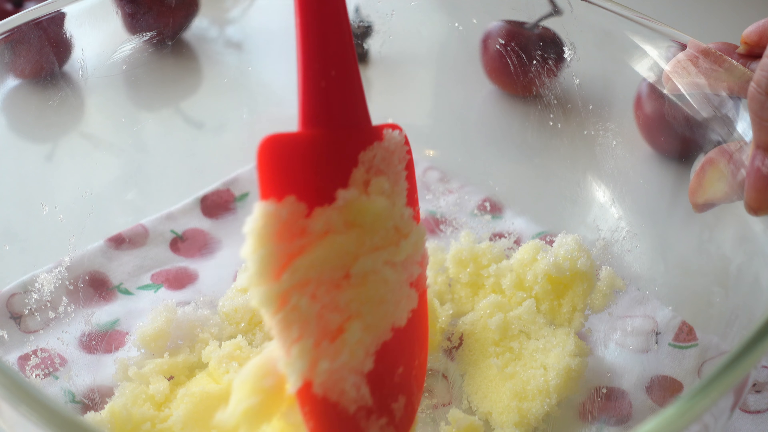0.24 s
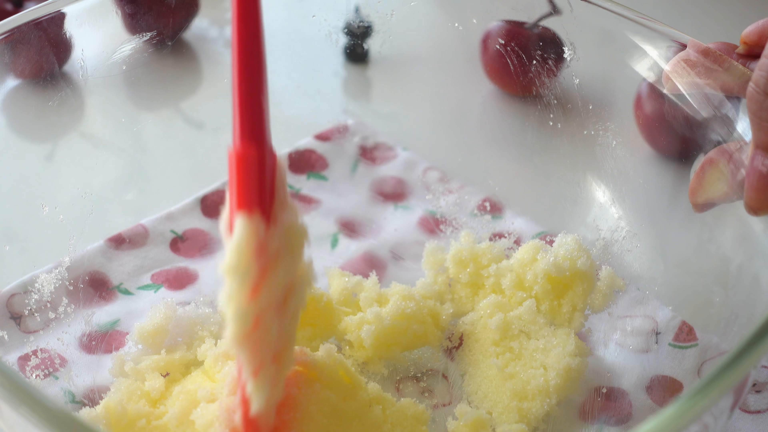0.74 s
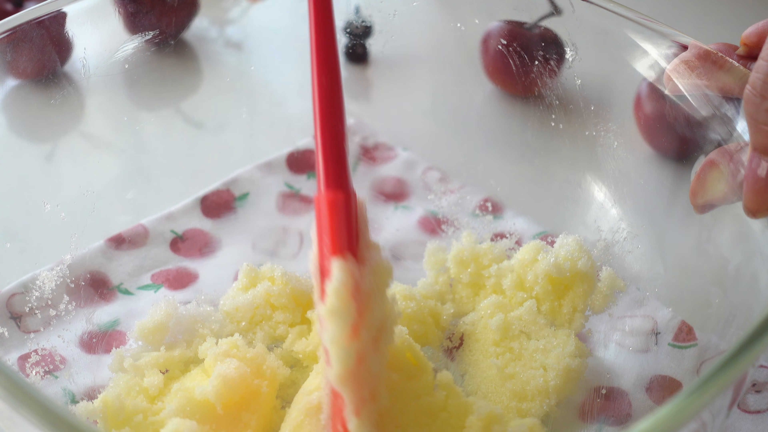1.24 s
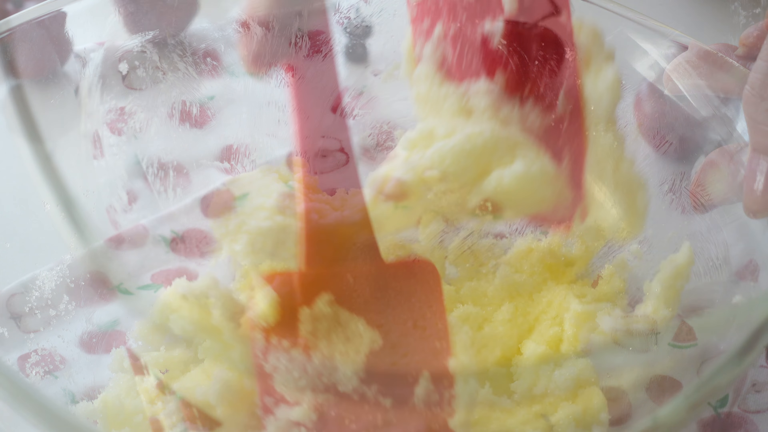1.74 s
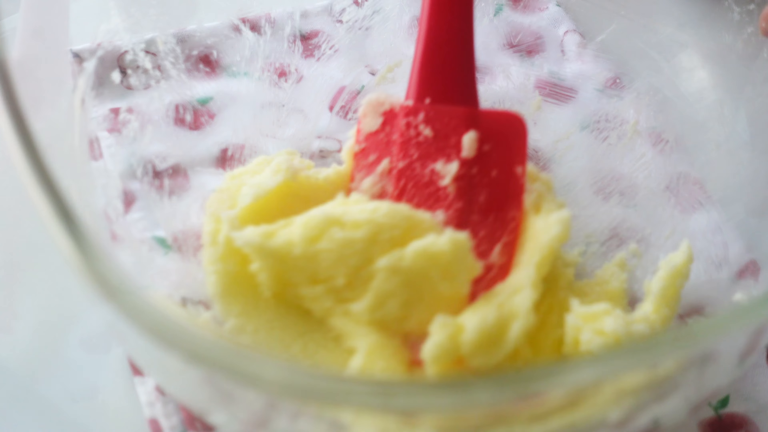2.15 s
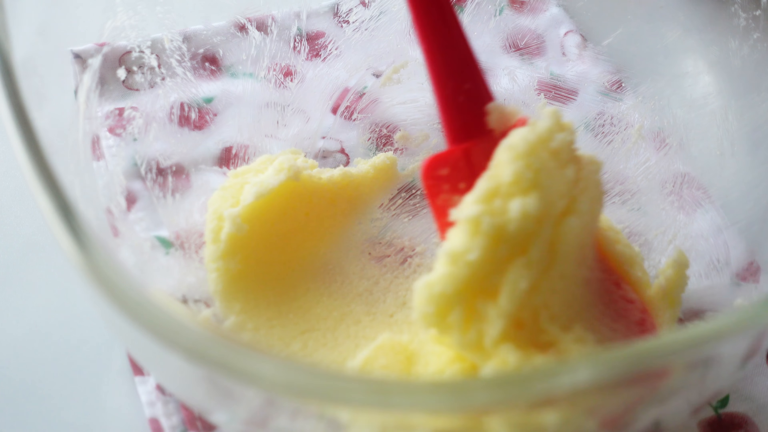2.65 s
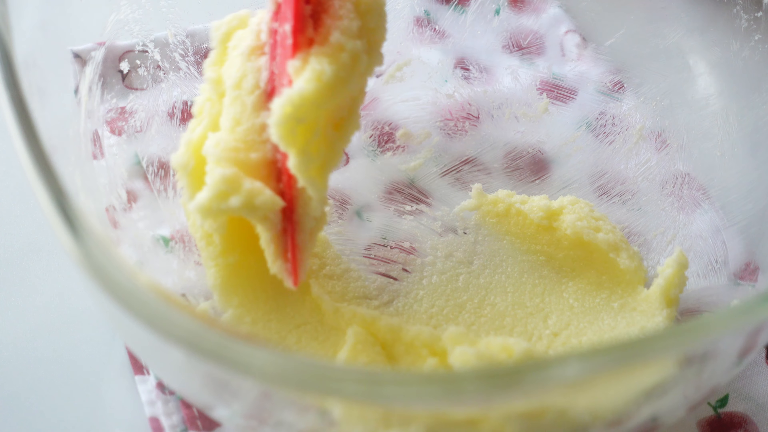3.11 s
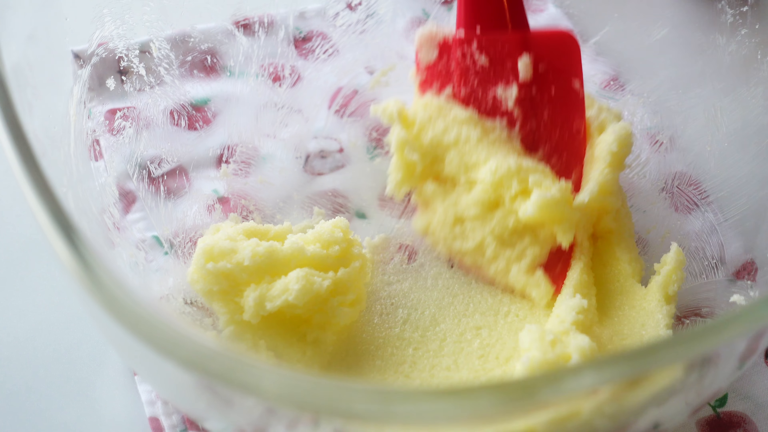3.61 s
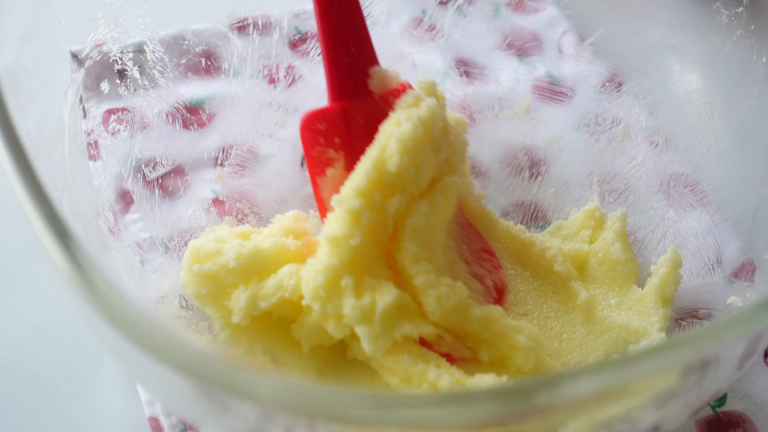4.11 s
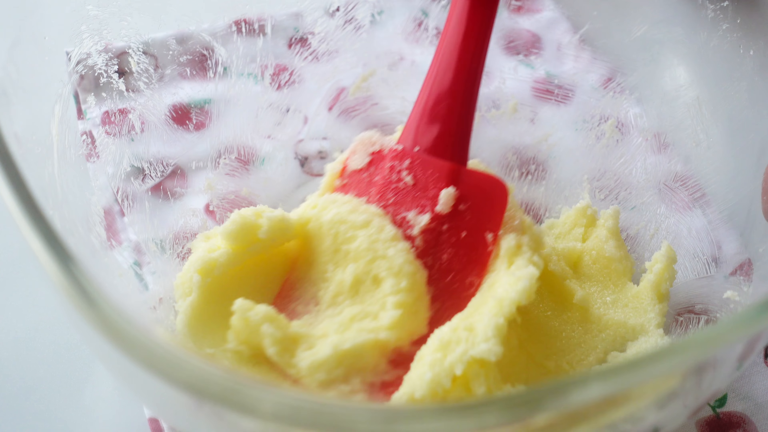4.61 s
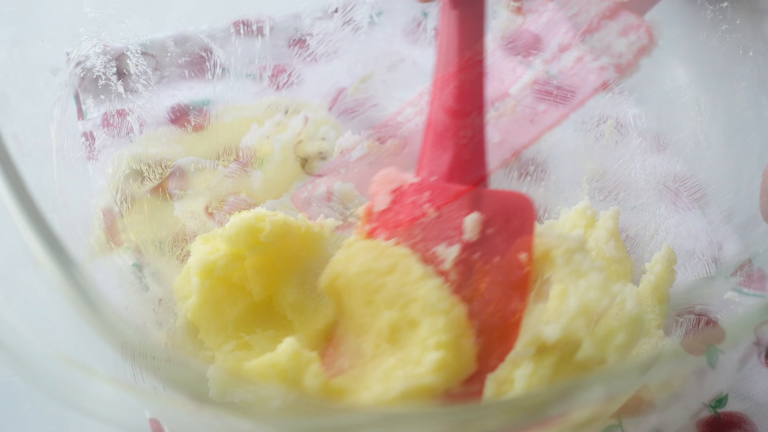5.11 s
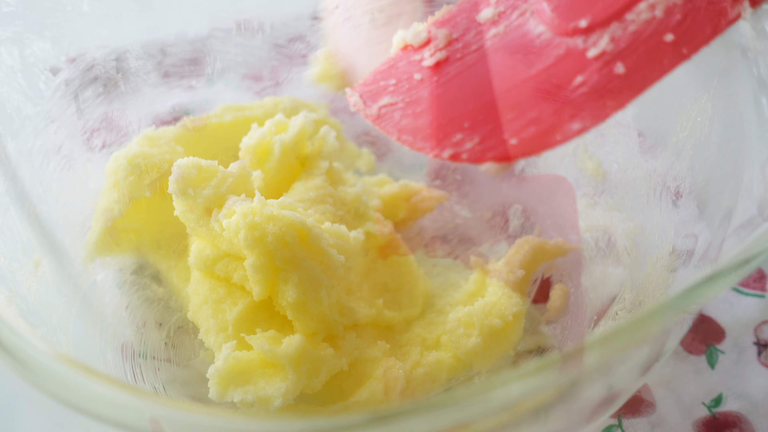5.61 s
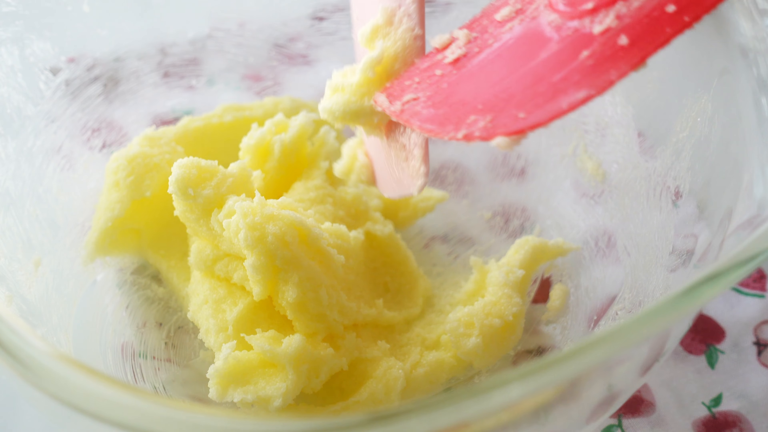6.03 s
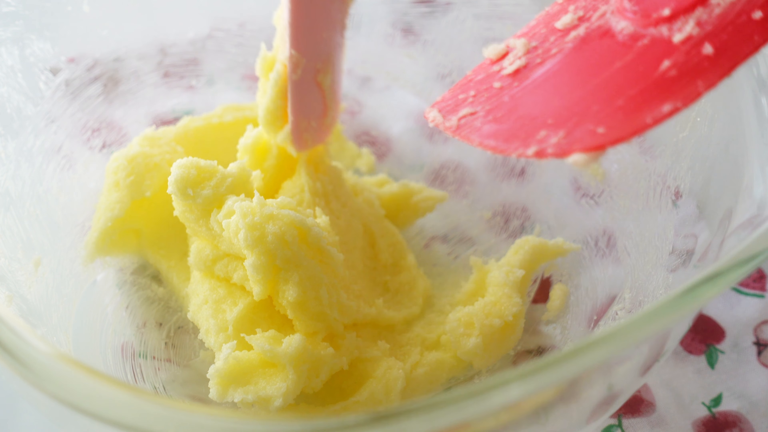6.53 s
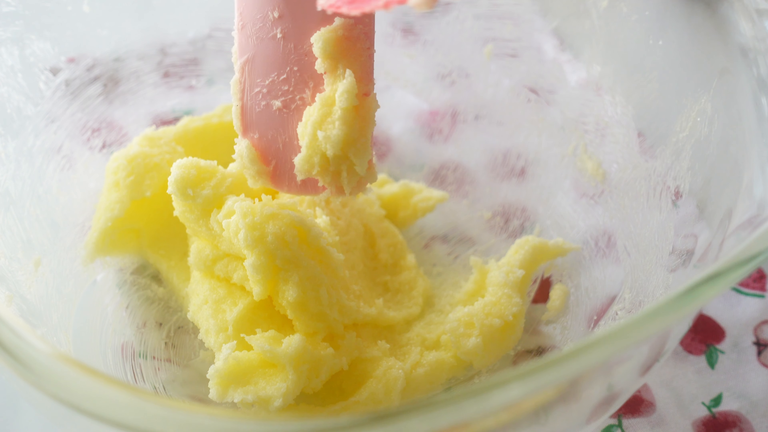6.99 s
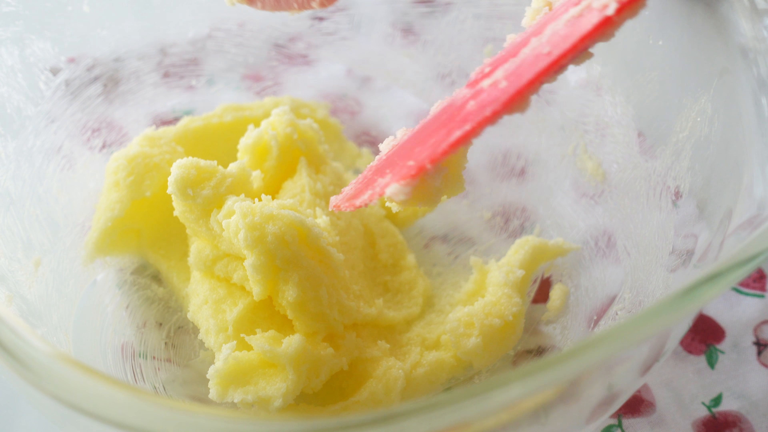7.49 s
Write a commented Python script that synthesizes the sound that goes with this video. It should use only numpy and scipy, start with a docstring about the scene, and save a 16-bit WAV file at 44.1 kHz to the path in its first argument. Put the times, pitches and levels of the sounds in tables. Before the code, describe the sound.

Close stereo sound in a quiet kitchen: sandy crunching as a soft blade works sugar into butter against glass. Early strokes are loose and thin, with a tiny level dip just after one second, then they grow harder, with bright pings of cracking crystals, brief rough squeaks and muffled thuds. After six seconds, rubber scrapes lightly on rubber, almost fading into faint hum and airy room noise.

```python
"""A rubber spatula drags butter and sugar round a glass bowl: crystals slip in crowds, each ringing briefly.
The fainter late drags are two spatulas scraping each other clean. Single crystals crack as short, bright pings,
friction noise through resonances squeaks, and knocks ring the damped glass over a dull thud.
The microphone stand wobbles after a push as slow decaying sines, and the whole level dips briefly.
Mains hum (sines) and kitchen rush (banded noise) lie below and change a little from spell to spell."""
import sys
import numpy as np
from scipy import signal
from scipy.io import wavfile

SR = 44100
rng = np.random.default_rng(int(sys.argv[2]) if len(sys.argv) > 2 else 0)


def unload_audio(sound):
    """Save the sound as a 16-bit wav file, at the path given as the first command line argument."""
    columns = np.transpose(np.atleast_2d(sound))
    # keep every value between -1 and 1, then stretch to whole-number steps
    steps = np.round(np.clip(columns, -1, 1) * 32767)
    wavfile.write(sys.argv[1], SR, steps.astype(np.int16))


N = 341775

# Spells of steady background. Each row: start in seconds, mains frequency in Hz, hum level in dB.
BACKGROUND_SPELLS = [(0, 59.97, -40), (1.276, 59.96, -40.2), (5.862, 59.91, -38.3)]


def from_db(db):
    """Turn dB into an amplitude gain."""
    return 10 ** (np.asarray(db) / 20)


def rms_one(x):
    """Scale to rms 1."""
    return x / np.sqrt(np.mean(x ** 2) + 1e-20)


def at_hz(points, hz):
    """Read a table of (Hz, value) between its points on a log-frequency axis."""
    table_hz, values = np.array(points).T
    return np.interp(np.log(hz), np.log(table_hz), values)


def drift(rate_hz):
    """Random wander of rms about 1: noise through two equal one-pole low-passes at rate_hz."""
    step = 40  # samples between the points of the wander
    settling = 2000  # points dropped while the filter settles
    pole = np.exp(-2 * np.pi * rate_hz * step / SR)
    noise = rng.standard_normal(N // step + settling + 2)
    slow = signal.lfilter([1], [1, -2 * pole, pole * pole], noise)[settling:]
    return np.interp(np.arange(N) / step, np.arange(len(slow)), rms_one(slow))


def ring(push, hz, t60_s):
    """Damped resonance: a unit click sets a sine of initial height 1 decaying by 60 dB in t60_s."""
    decay = from_db(-60 / (t60_s * SR))
    turn = 2 * np.pi * hz / SR
    feedback = [1, -2 * decay * np.cos(turn), decay * decay]
    return signal.lfilter([0, np.sin(turn)], feedback, push + 1e-18)


def spell(values):
    """Hold one value through each spell of background."""
    starts = np.array(BACKGROUND_SPELLS)[:, 0]
    which = np.searchsorted(starts, np.arange(N) / SR, "right") - 1
    return np.asarray(values)[which]


def spread(mid, side, hz):
    """Stereo from mid and side: narrowest in the low treble, wider toward the top."""
    # Side level of the scraping and cracking by frequency. Each row: frequency in Hz, side relative to mid in dB.
    side_db = [(1300, -16), (2400, -26), (4400, -20), (8000, -8), (15000, -5)]
    return mid + from_db(at_hz(side_db, hz)) * side * np.array([[1], [-1]])


def blade_pressure():
    """Gains of medium, coarse and fine grit and of the rub; drags and presses add in power."""
    # Blade drags through the mix. Each row: start and end in seconds, medium grit at the start and at the end
    # in dB, lift-off in seconds, then relative to medium in dB: coarse grit, fine grit, rub of the rubber.
    drags = [(0.0, 0.045, -49.5, -53, 0.18, 2.5, -4.5, -6), (0.796, 0.83, -42, -47, .04, 2, 0.5, -9),
             (0.87, 1.057, -53, -69, 0.14, -2, -2.5, -7), (1.33, 1.732, -59.5, -44.5, 0.038, 2.5, -2, -8),
             (1.956, 2.317, -52, -41, 0.038, -1, -6, -7.5), (2.36, 2.517, -72, -72, .03, 2, -5, -10),
             (2.594, 2.861, -55.5, -44, 0.063, 0.5, -2.5, -6), (2.894, 3.1, -51, -47.5, 0.039, 0, -3, -8),
             (3.128, 3.363, -59.5, -48.5, .06, -2, -4.5, -13), (3.4, 3.68, -65, -47.5, 0.06, 2, 2.5, -6),
             (3.989, 4.275, -48, -42, 0.059, 0, -3, -9), (4.32, 4.39, -61, -65, .03, -3, 1, -13),
             (4.507, 4.827, -50, -43.5, .024, 0, -2.5, -8.5), (5.02, 5.39, -55.5, -48.5, 0.085, -2, -3, -8),
             (5.54, 5.852, -53, -42.5, 0.0053, 3, -1.5, -9), (5.982, 6.26, -64, -81, .03, 2.5, 1, -6),
             (6.37, 6.518, -60, -56, 0.072, -2.5, -2.5, -12), (6.56, 7.18, -70.5, -81, .03, 3, -3, -6),
             (7.25, 7.417, -70, -61.5, .026, 2, -2, -9)]
    # Brief harder presses. Each row: peak time in seconds, medium grit in dB, rise and fade in seconds,
    # then relative to medium in dB: coarse grit, fine grit, rub of the rubber.
    presses = [(0.386, -39.5, 0.1, 0.093, 0.5, -9.5, -14), (0.53, -41, 0.06, 0.042, -0.5, -6, -18),
               (0.849, -33.5, 0.032, 0.02, -5.5, -13, -18), (0.994, -49.5, 0.054, 0.07, 0.5, -5, -9),
               (1.145, -49.5, 0.014, 0.0092, 5, -3, -14), (1.268, -44, 0.087, 0.063, 2, -1, -9.5),
               (1.311, -44, 0.034, 0.03, -3, -3.5, -16), (1.46, -44, .15, 0.22, -3, -8, -9.5),
               (1.69, -46.5, 0.11, .07, 7.5, 4, -12), (1.981, -44, 0.038, 0.035, 7.5, 1.5, -2),
               (2.098, -47, 0.1, .15, -3, -0.5, -11), (2.281, -33.5, 0.11, 0.056, 1.5, 1.5, -19),
               (2.559, -41, 0.031, 0.027, -1.5, -8, -9), (2.635, -43.5, 0.024, 0.029, -7, -6, -8),
               (2.845, -50, 0.15, 0.038, -7, -7, -16), (3.25, -35.5, 0.022, 0.021, -5.5, -11, -8.5),
               (3.309, -46, 0.1, 0.082, -3, -7, -7.5), (3.597, -36, 0.27, 0.14, -2.5, -7.5, -14.5),
               (3.913, -35, 0.033, 0.046, -3, -4, -1.5), (4.031, -30, 0.026, .06, -11.5, -12, -11),
               (4.446, -38.5, 0.036, .075, -6, -4.5, -10.5), (4.706, -44, 0.13, 0.064, 1.5, -1, -8),
               (4.765, -39, 0.054, .055, 6.5, 3.5, -9), (4.977, -66, .012, .015, 3, 6, 1),
               (5.026, -39, 0.017, .075, -1.5, -4, -7.5), (5.165, -43.5, 0.12, 0.23, 2, -1.5, -8),
               (5.318, -43, 0.15, 0.12, 4.5, 0, -9.5), (5.558, -41, 0.028, 0.054, -7, -3.5, -5.5),
               (5.921, -56, 0.063, 0.11, 3, -1, -16), (6.297, -49.5, 0.04, 0.043, -3, -6, -20),
               (6.43, -55, 0.091, .08, -4.5, -12, -14), (6.475, -43.5, .022, 0.034, -18, -8, -23),
               (7.277, -61.5, 0.095, 0.12, -1.5, 1, -9)]
    land_s, edge_db = 0.033, 28  # a drag rises by edge_db in land_s and falls as much in its lift-off
    fade_db, roundness = 21, 1.21  # a press loses fade_db over its rise or fade; loss grows as this power of time

    t = np.arange(0, N + 32, 32) / SR
    shapes = []
    for start, end, first_db, last_db, lift_s, *colour in drags:
        level_db = np.interp(t, [start, end], [first_db, last_db])
        landing_db = edge_db * np.maximum((start - t) / land_s, 0)
        lifting_db = edge_db * np.maximum((t - end) / lift_s, 0)
        shapes.append((level_db - landing_db - lifting_db, colour))
    for peak_s, peak_db, rise_s, fade_s, *colour in presses:
        away = np.maximum((peak_s - t) / rise_s, (t - peak_s) / fade_s)
        shapes.append((peak_db - fade_db * away ** roundness, colour))

    power = 0
    for level_db, colour in shapes:
        power = power + from_db(np.add.outer([0] + colour, level_db)) ** 2
    return [np.interp(np.arange(N) / SR, t, np.sqrt(p)) for p in power]


def random_sizes(size_db, limit):
    """Random stereo impulse heights of either sign, with a few much larger."""
    size = np.minimum(rng.exponential(1, (2, N)), limit)
    return from_db(size_db * size) * rng.choice([-1, 1], (2, N))


def grit(modes, per_s, size_db, cycles, clump):
    """Random slips, a few much larger, ring short resonances whose strengths wander separately."""
    out = 0
    for hz, level_db in modes:
        favour = from_db(2.56 * drift(8.7))
        happens = rng.random((2, N)) < per_s / SR
        slips = random_sizes(size_db, 5) * clump * favour * happens
        t60_s = cycles / hz
        mid, side = ring(ring(slips, hz, t60_s), hz, t60_s)
        out = out + from_db(level_db) * spread(rms_one(mid), rms_one(side), hz)
    return rms_one(out)


def crackle(pressure):
    """Small crystals snap one by one, thin and broad, louder as the blade presses harder."""
    snaps = random_sizes(2.5, 4) * (rng.random(N) < 170 / SR)  # 170 snaps a second
    band = signal.butter(2, [2600, 11000], "band", fs=SR, output="sos")
    mid, side = signal.sosfilt(band, snaps)
    return from_db(-9.5) * pressure * rms_one(spread(mid, side, 6500))


def grinding():
    """Crackle, three sizes of sugar grit and the rubber itself under one juddering blade."""
    # Short resonances of the rubber and of each size of grit. Each row: frequency in Hz, relative level in dB.
    rubber_modes = [(1350, -2.1), (1650, -0.62), (2000, 1)]
    coarse_modes = [(2450, -2), (2800, -1.5), (3200, 0.5), (3600, -1.5), (4050, 1.5)]
    medium_modes = [(4500, -9), (5000, 0), (5600, 2), (6200, -1.5), (6750, -8), (7200, -2)]
    fine_modes = [(8200, 1), (9300, -8), (10500, 7), (11600, -8.5), (12800, 4), (14000, -15), (15300, -1)]

    medium, coarse, fine, rub = blade_pressure()
    judder = from_db(0.4 * drift(43) + 0.68 * drift(85))
    # now and then a bigger crystal gives way and briefly jolts all sizes of grit
    gives_way = (rng.random(N) < 120 / SR) * rng.exponential(0.46, N)
    jolts = signal.lfilter([1], [1, -0.93], gives_way)
    jolted = judder * (1 + jolts)

    out = crackle(np.hypot(medium, coarse))
    out = out + rub * grit(rubber_modes, per_s=1500, size_db=3.0, cycles=8.6, clump=judder)
    out = out + coarse * grit(coarse_modes, per_s=1500, size_db=0.5, cycles=11.4, clump=jolted)
    out = out + medium * grit(medium_modes, per_s=2500, size_db=2.5, cycles=13.0, clump=jolted)
    return out + fine * grit(fine_modes, per_s=3000, size_db=0.5, cycles=8.1, clump=jolted)


def hum():
    """Sines at multiples of the mains, the fundamental nearer the left, and a faint high whine."""
    # Hum spectrum. Each row: multiple of the mains, left and right in dB relative to the spell's hum level.
    multiples = [(1, 0, -4.5), (2, -25.5, -19.5), (3, -14.5, -23.5), (4, -40.5, -55), (5, -23.5, -26.5)]
    whine_hz, whine_db = 13884, -82

    _, mains_hz, hum_db = np.transpose(BACKGROUND_SPELLS)
    turn = 2 * np.pi * np.cumsum(spell(mains_hz)) / SR
    lines = 0
    for multiple, left_db, right_db in multiples:
        sine = np.sin(round(multiple) * turn + rng.uniform(0, 2 * np.pi))
        lines = lines + np.outer(from_db([left_db, right_db]), sine)
    whine = np.sin(2 * np.pi * whine_hz * np.arange(N) / SR + 3 * drift(2))  # its phase wanders
    return from_db(spell(hum_db)) * lines + np.outer(from_db([whine_db, whine_db - 15]), whine)


def rush():
    """Third-octave bands of stereo noise, with a broad hump that is strong only in the first spell."""
    # Spectrum of the kitchen rush. Each row: frequency in Hz, relative density in dB per Hz.
    density_db = [(20, -13), (32, -7), (44, 3.5), (85, -7), (125, -8.5), (200, 2), (300, -5.5), (600, -10),
                  (800, -8.5), (1250, -16.5), (1600, -18), (2600, -24), (5000, -29.5), (9000, -37),
                  (16000, -39)]
    # Stereo likeness. Each row: frequency in Hz, left-right correlation from 0 to 1.
    likeness = [(30, 0.38), (180, 0.72), (550, 0.7), (1650, 0.65), (5000, 0.45), (15000, 0.045)]
    # Stereo balance. Each row: frequency in Hz, left over right in dB.
    left_over_right_db = [(30, 10.5), (180, 4), (550, 1), (1650, 2), (15000, -0.5)]
    # Levels, one row a spell: rush in dB, extra hump near 1.4 kHz in dB.
    spell_levels = [(-47.5, -56.5), (-49.5, -72), (-48, -73)]

    out = 0
    edges = 16 * 2 ** (np.arange(31) / 3)
    white = rng.standard_normal((3, 2, N))
    for k, (low, high) in enumerate(zip(edges, edges[1:])):
        band = signal.butter(2, [low, high], "band", fs=SR, output="sos")
        mid, side = signal.sosfilt(band, white[k % 2])  # neighbouring bands use separate noise
        hz = np.sqrt(low * high)
        alike = np.clip(at_hz(likeness, hz), 0, 1)
        pan = from_db(at_hz(left_over_right_db, hz) * np.array([[0.5], [-0.5]]))
        gain = from_db(at_hz(density_db, hz) + 0.73 * drift(4.6))
        stereo = np.sqrt(1 + alike) * mid + np.sqrt(1 - alike) * side * np.array([[1], [-1]])
        out = out + gain * pan * stereo

    hump_band = signal.butter(1, [900, 2000], "band", fs=SR, output="sos")
    mid, side = signal.sosfilt(hump_band, white[2])
    hump = rms_one(mid + 0.39 * side * np.array([[1], [-1]]))
    rush_db, hump_db = np.transpose(spell_levels)
    return from_db(spell(rush_db)) * rms_one(out) + from_db(spell(hump_db)) * hump


def lesser_cracks():
    """Crack rows at random times and pitches, as strong as the blade presses then."""
    count, cycles = 70, 7
    over_grit_db, scatter_db = 11, 5.5  # peak over medium grit, and scatter either way
    low_hz, high_hz = 3230, 6000

    when, size, tint, pitch = rng.random((count, 4)).T
    medium = blade_pressure()[0]
    level_db = 20 * np.log10(medium[(when * N).astype(int)] + 1e-9) + over_grit_db
    seconds = when * N / SR
    peak_db = level_db + scatter_db * (2 * size - 1)
    treble_db = level_db + scatter_db * (2 * tint - 1)
    hz = low_hz + pitch * (high_hz - low_hz)
    return list(zip(seconds, peak_db, hz, treble_db, [cycles] * count))


def cracks():
    """A sharp break ringing a few cycles, a bright tick on top and a splintering tail."""
    # Single crystals cracking. Each row: time in seconds, peak in dB, pitch in Hz, treble peak in dB,
    # cycles of ringing to -60 dB.
    crack_rows = [(0.0201, -37, 4090, -37, 7), (0.4533, -39, 4940, -35, 7), (0.5328, -28, 5680, -32, 7),
                  (0.8938, -29, 3920, -45, 7), (1.2652, -26, 5180, -31, 7), (1.4476, -25, 3040, -29, 7),
                  (1.484, -19, 4870, -26, 4), (1.6283, -23, 3950, -33, 7), (1.6844, -21, 3250, -21, 7),
                  (1.6876, -24, 2880, -24, 7), (1.9815, -21, 3900, -36, 8), (2.0338, -24, 5550, -31, 7),
                  (2.07, -27, 5180, -32, 7), (2.0839, -19, 3850, -30, 4), (2.2588, -24, 3210, -20, 7),
                  (2.2693, -27, 6120, -16, 7), (2.286, -11, 4040, -17, 7), (2.82, -27, 3800, -38, 5),
                  (2.849, -25, 5400, -34, 6), (2.8982, -28, 2680, -37, 7), (2.982, -29, 4760, -31, 7),
                  (3.0942, -25, 3550, -36, 7), (3.2476, -19, 4150, -33, 4), (3.2891, -26, 4920, -23, 7),
                  (3.3323, -27, 4520, -29, 7), (3.3494, -24, 3340, -42, 9), (3.3904, -16, 3320, -27, 14),
                  (3.5462, -14, 4600, -24, 4), (3.5687, -14, 3730, -31, 8), (3.5805, -21, 5300, -32, 7),
                  (3.9167, -17, 2790, -32, 7), (3.941, -25, 3610, -42, 7), (3.976, -27, 3700, -30, 7),
                  (4.0034, -14, 5480, -17, 5), (4.015, -19, 5630, -35, 7), (4.0202, -14, 6150, -21, 7),
                  (4.0283, -20, 5500, -30, 7), (4.0363, -23, 5840, -20, 7), (4.2522, -7, 4700, -19, 4),
                  (4.5716, -25, 5400, -23, 7), (4.6466, -30, 5780, -26, 7), (4.6952, -22, 4140, -29, 7),
                  (4.7468, -15, 3130, -29, 10), (5.0215, -6, 5130, -23, 5), (5.1365, -16, 4160, -33, 4),
                  (5.2341, -18, 3900, -30, 4), (5.3246, -20, 2610, -36, 8), (5.558, -23, 4310, -26, 7),
                  (5.8395, -19, 3100, -16, 14), (5.8544, -23, 4800, -32, 7), (6.0179, -39, 5930, -39, 7),
                  (6.3879, -37, 6220, -41, 7), (7.3206, -44, 5350, -39, 7), (7.328, -31, 5800, -38, 3.5)]

    length = 600  # samples kept of each crack
    out, t = np.zeros((2, N + length)), np.arange(length) / SR
    breaks = crack_rows + lesser_cracks()
    noise = rng.standard_normal((len(breaks), 3, length))
    bright = signal.butter(2, [8000, 15500], "band", fs=SR, output="sos")
    for (s, peak_db, hz, treble_db, cycles), (tail, tick_mid, tick_side) in zip(breaks, noise):
        push = from_db(-19) * tail * np.exp(-t / 0.001)  # splintering
        push[0] = 1  # the break itself
        # a tiny source radiates little below its pitch
        small = signal.butter(3, 0.49 * hz, "high", fs=SR, output="sos")
        body = signal.sosfilt(small, ring(push, hz, max(cycles, 2) / hz))
        burst = np.array([tick_mid, tick_side]) * np.exp(-t / 0.0006)
        tick = spread(*signal.sosfilt(bright, burst), 11000)
        i = round(s * SR)
        out[:, i:i + length] += from_db(peak_db) * body / np.abs(body).max()
        out[:, i:i + length] += from_db(treble_db) * tick / np.abs(tick).max()
    return out[:, :N]


def knocks():
    """Soft rubber on buttered glass: a dull thud through the counter and a rough landing into damped modes."""
    # Blade knocks the bowl. Each row: time in seconds, drive of the low thud in dB, drive of the glass in dB.
    knock_rows = [(0.844, -39, -33), (1.447, -55, -33.5), (1.979, -48, -28), (2.038, -39, -58),
                  (2.567, -28, -33.5), (2.629, -40, -46), (3.247, -29.5, -28), (3.913, -33, -22.5),
                  (4.451, -40, -36), (5.029, -30.5, -36), (5.556, -51, -38), (5.841, -40, -54)]
    # Modes of the glass. Each row: frequency in Hz, relative level in dB, 60 dB decay in seconds.
    bowl_modes = [(470, -9, 0.015), (696, -6.5, 0.018), (930, -18, 0.02), (1430, -9, 0.023),
                  (1790, -28, 0.044), (2150, -19, 0.038), (2290, -32.5, 0.01)]

    s, thud_db, glass_db = np.transpose(knock_rows)
    at = np.round(s * SR).astype(int)
    thud_clicks, glass_clicks = np.zeros(N), np.zeros(N)
    thud_clicks[at] = from_db(thud_db)
    glass_clicks[at] = from_db(glass_db)

    soft = signal.butter(2, 220, fs=SR, output="sos")
    out = signal.sosfilt(soft, ring(thud_clicks, hz=90, t60_s=0.05))
    # each landing is a noise burst that falls to 1/e in 4.1 ms
    landing = signal.lfilter([1], [1, -np.exp(-1 / (0.0041 * SR))], glass_clicks + 1e-18)
    for hz, level_db, t60_s in bowl_modes:
        rough = landing * rng.standard_normal(N)
        out += ring(from_db(level_db - 16.5) * rough, hz, t60_s)
    return out


def wobble():
    """A push on the stand sets three slow modes swinging; the last rocks the microphones in opposite ways."""
    # Modes of the stand. Each row: onset in seconds, frequency in Hz, left and right in dB,
    # 60 dB decay in seconds, sign of the left (the right is always -1).
    stand_modes = [(1.269, 10.71, -30.6, -33.8, 3.1, -1), (1.288, 19.34, -30.2, -29.2, 4.7, -1),
                   (1.277, 20.86, -38, -40, 3.6, 1)]

    out = 0
    for s, hz, left_db, right_db, t60_s, left_sign in stand_modes:
        push = np.zeros(N)
        push[round(s * SR)] = 1
        sides = from_db([left_db, right_db]) * [left_sign, -1]
        out = out + np.outer(sides, ring(push, hz, t60_s))
    return out


def level_dip():
    """Gain on everything: the level dips briefly and swells back."""
    # Points of the dip. Each row: time in seconds, linear gain.
    dip_points = [(1.2715, 1), (1.273, .05), (1.278, .15), (1.295, 1)]
    return np.interp(np.arange(N) / SR, *np.transpose(dip_points))


def squeaks():
    """Fluttering friction noise twice through one resonance, swelling and fading."""
    # The scrape narrows to one colour or a faint squeak. Each row: start and end in seconds,
    # pitch in Hz, width of the resonance in Hz, level before the swell in dB.
    squeak_rows = [(2.83, 2.934, 2480, 300, -52), (2.967, 3.12, 4180, 1500, -45.5),
                   (3.345, 3.615, 3470, 1000, -43), (3.602, 3.684, 2380, 500, -41),
                   (4.433, 4.51, 4000, 1300, -39), (5.607, 5.734, 3330, 600, -52),
                   (6.293, 6.34, 5600, 500, -56), (6.32, 6.37, 4020, 100, -66),
                   (6.456, 6.52, 5750, 900, -50), (7.253, 7.295, 4670, 200, -66),
                   (7.36, 7.385, 4800, 200, -66)]

    out, t = np.zeros(N), np.arange(N) / SR
    friction = rng.standard_normal(N) * from_db(2.0 * drift(40))
    for start, end, hz, width_hz, level_db in squeak_rows:
        on = (t > start) & (t < end)
        t60_s = np.log(1000) / (np.pi * width_hz)
        swell = np.sin(np.pi * (t[on] - start) / (end - start))  # loudest in the middle
        tone = ring(ring(friction[on], hz, t60_s), hz, t60_s)
        out[on] += from_db(level_db) * swell * rms_one(tone)
    return out


def scene():
    """Bowl close in the middle, background all round, all under the one brief dip."""
    bowl = grinding() + cracks() + knocks() + squeaks()
    background = hum() + rush() + wobble()
    return level_dip() * (bowl + background)


def record(dry):
    """Cut the top steeply: 60 dB down from 15950 Hz."""
    steep = signal.cheby2(28, 60, 15950, fs=SR, output="sos")
    return signal.sosfilt(steep, dry)


dry = scene()
out = record(dry)
unload_audio(out)
```